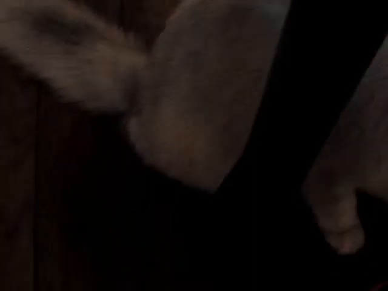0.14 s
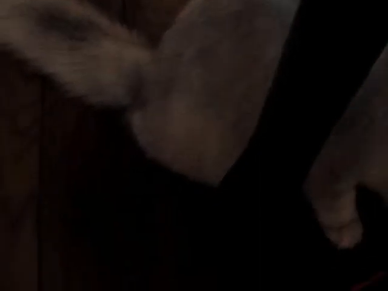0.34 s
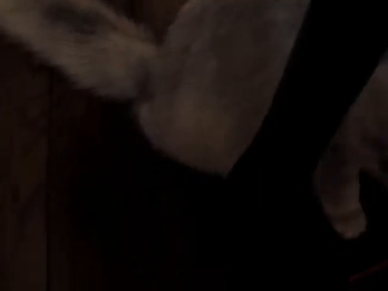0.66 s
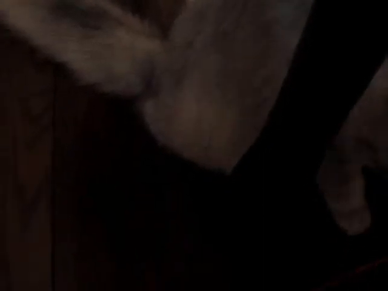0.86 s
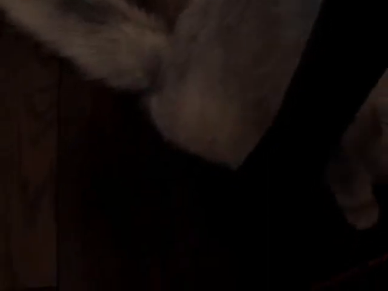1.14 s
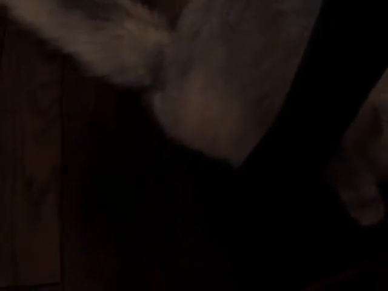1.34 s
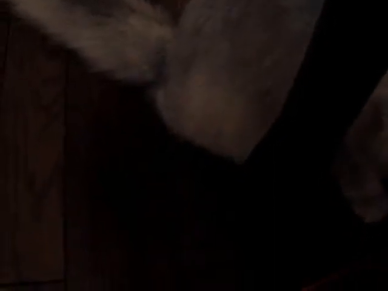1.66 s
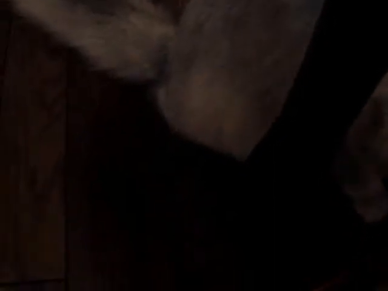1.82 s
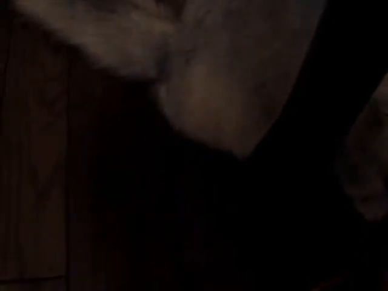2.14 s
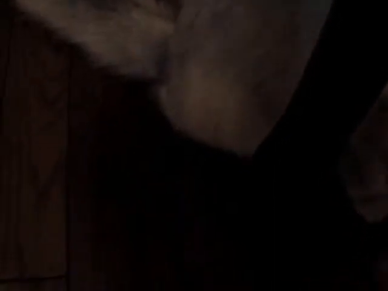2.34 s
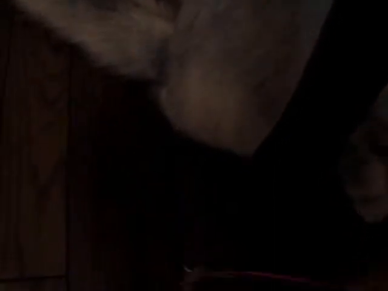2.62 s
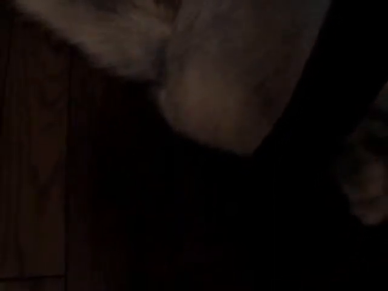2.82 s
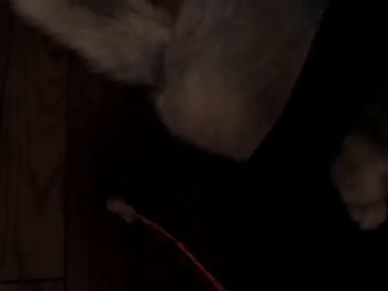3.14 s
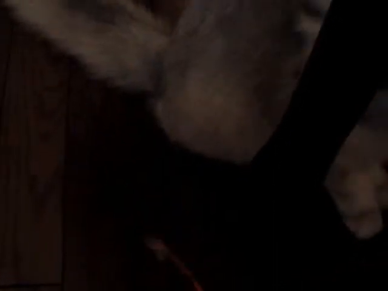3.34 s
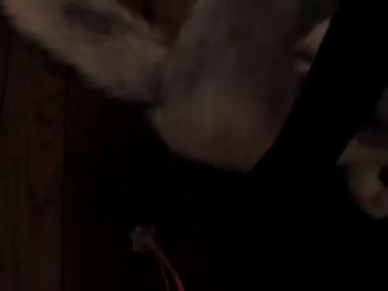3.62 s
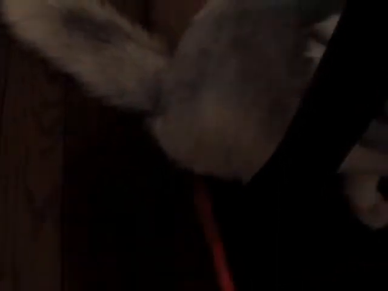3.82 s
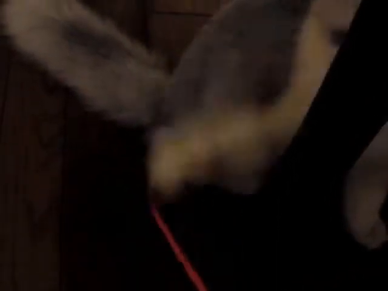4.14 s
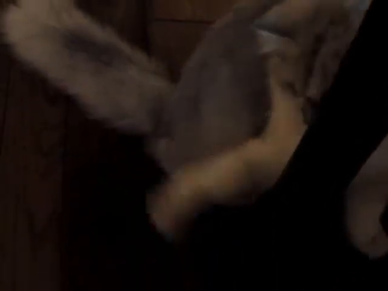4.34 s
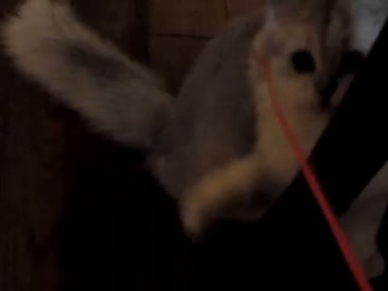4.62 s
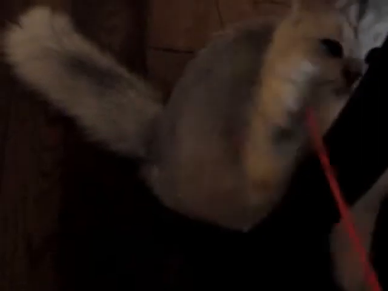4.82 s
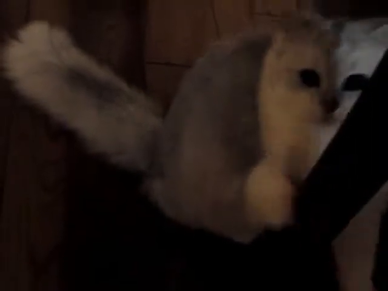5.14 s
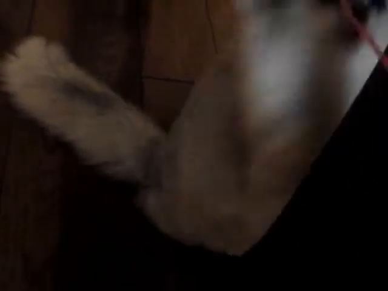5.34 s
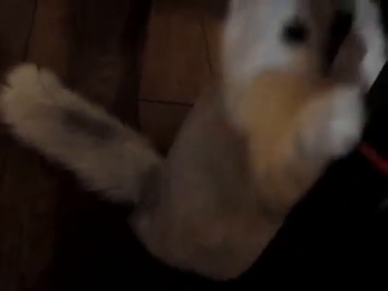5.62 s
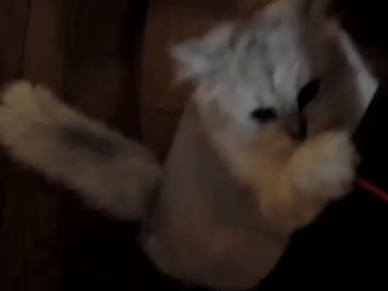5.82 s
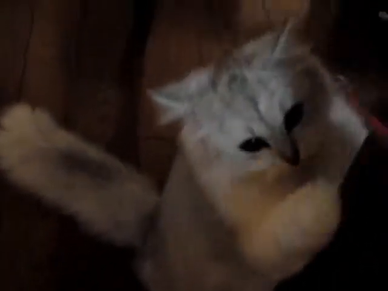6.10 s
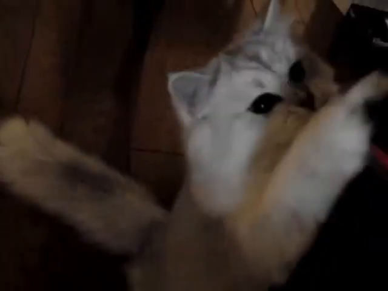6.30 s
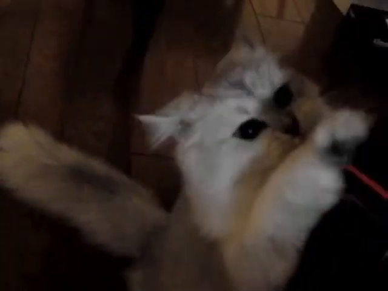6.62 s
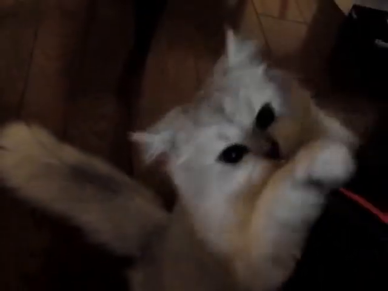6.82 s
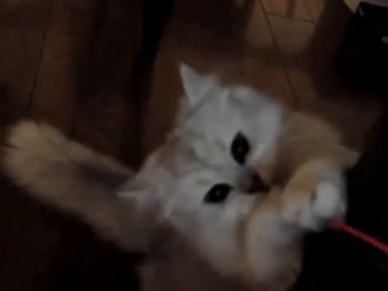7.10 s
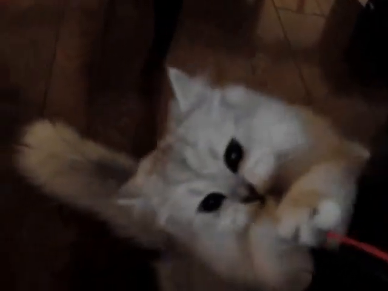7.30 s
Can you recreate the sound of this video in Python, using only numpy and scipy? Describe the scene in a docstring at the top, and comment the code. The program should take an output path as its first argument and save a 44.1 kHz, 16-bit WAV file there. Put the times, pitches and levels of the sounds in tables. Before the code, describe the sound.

Soft brushing and dry taps on floorboards give way to busy, bright little bell jingles, with hollow knocks and sharp snaps in a quiet room.

```python
"""A toy brushes softly over a wooden floor in a quiet small room, then its wand clacks on the boards.
Its little bell jingles in short bursts: a pellet rings two shell modes until fur and paws choke them.
Wand clacks are coloured noise, rubbing and dragging are noise with tiny slips, all played by a cat.
Late on, the cat lunges and bumps three times into hollow furniture, a bank of decaying panel modes,
with two sharp bright snaps; a tiny squeak, a bending sine, comes among them.
Air, drone and a faint hum run throughout."""
import sys
import numpy as np
from scipy import signal
from scipy.fft import rfft, irfft, next_fast_len
from scipy.io import wavfile
from scipy.ndimage import map_coordinates

SR = 44100
rng = np.random.default_rng(int(sys.argv[2]) if len(sys.argv) > 2 else 0)


def store_wav(level_fs):
    """Save 16-bit WAV to argv[1]."""
    pcm = np.round(np.clip(np.atleast_2d(level_fs), -1, 1) * 32767)
    wavfile.write(sys.argv[1], SR, pcm.T.astype(np.int16))


N = 328986  # length in samples
TIME = np.arange(N) / SR  # seconds


def amp(db):
    """Decibels to gain."""
    return 10 ** (np.asarray(db) / 20)


def unit(x):
    """x at rms 1."""
    return x / np.sqrt(np.mean(np.abs(x) ** 2) + 1e-20)


def along(points, hz):
    """(Hz, value) points read on a log frequency axis."""
    f, v = np.transpose(points)
    return np.interp(np.log(hz + 1), np.log(f + 1), v)


def fade(t, t60):
    """Exponential decay by 60 dB in t60 seconds."""
    return np.exp(-np.log(1000) * t / t60)


def filtered(x, response):
    """x times a response of frequency."""
    m = next_fast_len(len(x) + 8192)
    spectrum = rfft(x, m) * response(np.fft.rfftfreq(m, 1 / SR))
    return irfft(spectrum, m)[:len(x)]


def coloured(x, spectrum):
    """x with a (Hz, dB) colour, at rms 1."""
    return unit(filtered(x, lambda hz: amp(along(spectrum, hz))))


def bass_cut(x, hz):
    """Small bodies radiate little below hz."""
    return signal.lfilter(*signal.butter(3, hz, "high", fs=SR), x)


def add(track, s, x):
    """Mix x into the track at s seconds."""
    part = track[round(s * SR):][:len(x)]
    part += x[:len(part)]


def wobble(rate):
    """A smooth random curve, rate knots a second."""
    knots = rng.standard_normal(int(N * rate / SR) + 4)
    return map_coordinates(knots, [TIME * rate])


# Colour of the room air and hiss. Each row: frequency in Hz, relative level in dB.
AIR_COLOUR = [(15, -45.5), (25, -14.5), (81, -6), (102, -8), (134, -3), (160, -2.5), (216, -1.5),
              (470, -1.5), (506, -3), (719, -3.5), (996, -6.5), (1380, -8), (2010, -11.5), (6370, -16),
              (10000, -22.5), (13000, -60.5), (22000, -120)]
# Narrow noise bands of the drone. Each row: centre in Hz, width in Hz, level in dB.
DRONE_BANDS = [(107.6, 21, -71.5), (1410, 260, -69.5), (7580, 130, -74)]


def floor(air_db=-54.5, motor_hz=112, motor_db=-69):
    """Steady room air, a faint drone and the slightly wavering hum of a distant appliance."""
    air = amp(air_db + 0.14 * wobble(5.7)) * coloured(rng.standard_normal(N), AIR_COLOUR)
    drone = np.zeros(N)
    for centre, width, db in DRONE_BANDS:
        band = filtered(rng.standard_normal(N), lambda f: 1 / (1 + (2 * (f - centre) / width) ** 2))
        drone += amp(db) * unit(band)
    motor_phase = 2 * np.pi * motor_hz * TIME + 0.85 * wobble(6)
    motor = amp(motor_db + 1.5 * wobble(2.5)) * np.sqrt(2) * np.sin(motor_phase)
    return air + drone + motor


def friction(rate, spread_db, smooth):
    """Tiny slips of uneven size, rate a second, over a smooth rub."""
    sizes = amp(spread_db * np.clip(rng.standard_normal(N), -2, 2))
    slips = (rng.random(N) < rate / SR) * rng.choice([-1, 1], N) * sizes
    return unit(unit(slips) + smooth * rng.standard_normal(N))


def strokes(rows, attack_s=0.013, release_t60=0.067):
    """Gain of rubbing strokes: each rises, holds and dies away."""
    gain = np.zeros(N)
    for s, length, db in rows:
        rise = np.clip((TIME - s) / attack_s, 0, 1)
        gain += amp(db) * rise * fade(np.maximum(TIME - s - length, 0), release_t60)
    return gain


# Strokes of the toy brushing the floor. Each row: start in seconds, length in seconds, level in dB.
BRUSH_STROKES = [(0, 0.084, -55), (.19, .2, -53), (1.19, 0.062, -52.5), (1.655, 0.014, -46),
                 (2.35, 0.076, -48), (2.44, 0.11, -51), (2.55, 0.14, -46.5), (2.715, 0.022, -43.5)]
# Colour of the brushing. Each row: frequency in Hz, relative level in dB.
BRUSH_COLOUR = [(120, -50), (200, -7), (332, -5), (366, -33), (404, -18), (517, 6.5), (753, -9), (1030, 5),
                (1230, 0.5), (2080, -5), (10000, -24.5), (13000, -69), (22000, -120)]
# Strokes of the wand sliding with a brighter hiss. Each row: start in seconds, length in seconds, level in dB.
SLIDE_STROKES = [(.02, .05, -51), (.215, .1, -44)]
# Colour of the sliding. Each row: frequency in Hz, relative level in dB.
SLIDE_COLOUR = [(300, -34), (1300, -9), (1750, 4), (2150, 2.5), (2600, -1.5), (3600, -6.5), (6000, -12.5),
                (10000, -29)]
# How hard the wand's grip is dragged over the boards. Each row: time in seconds, drive in dB before colouring.
DRAG_PRESSURE = [(2.776, -50), (2.782, -30.5), (2.812, -42.5), (2.858, -30), (2.9, -39.5), (2.992, -39),
                 (3.054, -34.5), (3.08, -28), (3.15, -65)]
# Colour of the drag. Each row: frequency in Hz, relative level in dB.
DRAG_COLOUR = [(90, -53), (160, -22), (320, -19), (620, -6.5), (900, 0.5), (1100, -8.5), (1600, -4.5),
               (2400, -10.5), (2800, -14), (3600, -12), (5500, -30.5), (8000, -54)]
# Resonances of the boards. Each row: centre in Hz, width in Hz, strength in dB against the direct slips.
BOARD_MODES = [(401, 34, 13), (800, 70, -3.5), (969, 22, 12), (1300, 60, 5), (1780, 32, 1), (2331, 45, 12)]


def rubbing():
    """The toy brushes softly and slides; the hard grip chatters over the grain and sets the boards ringing."""
    brush_grain = friction(rate=500, spread_db=1.5, smooth=0.44)
    brush = strokes(BRUSH_STROKES) * coloured(brush_grain, BRUSH_COLOUR)

    slide_grain = friction(rate=2400, spread_db=17.0, smooth=0.97)
    slide = strokes(SLIDE_STROKES) * coloured(slide_grain, SLIDE_COLOUR)

    # no drag at all outside the table
    pressure = amp(np.interp(TIME, *np.transpose(DRAG_PRESSURE), left=-np.inf, right=-np.inf))
    slips = pressure * friction(rate=500, spread_db=1.0, smooth=0.74)

    def boards(f):
        """The direct slips plus each resonance they excite."""
        return 1 + sum(amp(db) * 1j * f * w / (c * c - f * f + 1j * f * w) for c, w, db in BOARD_MODES)

    drag = filtered(slips, lambda hz: amp(along(DRAG_COLOUR, hz) + 12.0) * boards(hz))
    return brush + slide + drag


# Taps and clacks of the wand, and two sharp bright snaps, perhaps claws, at the bumps.
# Each row: time in seconds, level in dB before the makeup gain in clacks(),
# brightness in dB per octave, length of its chatter in seconds.
CLACK_HITS = [(0.1167, -23, -1, 0.023), (0.218, -37.5, -7.5, 0.0039), (0.3704, -30, -1, 0.0033),
              (.701, -51, -8.5, 0.004), (1.2, -45.5, -9.5, 0.019), (1.454, -44, -16, 0.0038),
              (1.671, -42.5, -5, 0.0038), (1.959, -49, -11, 0.0045), (2.558, -42, -4, .006),
              (2.602, -43.5, -4, 0.0076), (2.648, -40, -11, 0.0046), (2.7822, -27.5, -4.5, 0.0063),
              (2.822, -35.5, -7, 0.0045), (2.84, -32, -6.5, 0.043), (3.062, -33, 0, 0.019),
              (3.075, -33.5, 2, 0.015), (5.301, -27, 10, 0.0023), (6.3638, -26.5, 12.5, 0.00182)]


def chatter(count=4, loss_db=6, dulling=0.98):
    """Every contact (s, dB, brightness): rebounds grow weaker (dB) and duller (dB per octave)."""
    contacts = []
    for s, db, tilt, length in CLACK_HITS:
        for k in range(count):
            contacts.append((s + length * k / (count - 1), db - loss_db * k, tilt - dulling * k))
    return contacts


# Colour of the wand on wood, also lent to the snaps and the slap of the bumps.
# Each row: frequency in Hz, relative level in dB.
WAND_COLOUR = [(60, -36), (130, -17.5), (230, -3), (400, -11), (620, -4.5), (865, -0.5), (1150, -1.5),
               (1800, 3.5), (2400, 2.5), (3000, 1), (3500, 1.5), (4700, -5), (7000, -11.5), (10000, -19)]


def clacks(crack_t60=0.025, ring_t60=0.12, ring_db=-13, makeup_db=1):
    """The wand hits the boards, and two bright snaps: each a crack and a brief dense ring."""
    out, t = np.zeros(N), np.arange(SR // 5) / SR
    envelope = fade(t, crack_t60) + amp(ring_db) * fade(t, ring_t60)
    for s, db, tilt in chatter():
        def colour(hz):
            """The wand's colour, tilted by the brightness of this hit."""
            return amp(along(WAND_COLOUR, hz) + tilt * np.log2((hz + 600) / 2000))
        body = unit(filtered(rng.standard_normal(len(t)), colour))
        add(out, s, amp(db + makeup_db) * body * envelope)
    return bass_cut(out, 110)


# Clear strikes of the pellet in the bell. Each row: time in seconds, free ring in seconds,
# low mode level in dB, high mode level in dB.
CLEAR_STRIKES = [(.365, 0.016, -45, -48.5), (.415, .04, -52, -59.5), (.516, 0.027, -59, -70),
                 (1.707, 0.015, -47.5, -61), (1.835, 0.022, -61, -77), (2.029, 0.011, -52, -70),
                 (2.367, 0.018, -39, -56), (2.481, 0.011, -41.5, -58), (2.518, 0.021, -45, -66),
                 (2.571, 0.022, -44, -55), (2.8, 0.013, -44.5, -57), (2.907, 0.021, -45, -51.5),
                 (2.947, 0.026, -36.5, -59), (3.129, 0.021, -32, -38.5), (3.152, 0.015, -36.5, -45),
                 (3.178, 0.014, -39, -44.5), (3.254, 0.0088, -25.5, -32), (3.3, .01, -52, -41),
                 (3.313, 0.0049, -35, -52), (3.328, 0.015, -38, -32.5), (3.351, 0.022, -39, -55),
                 (3.388, 0.0067, -38, -41.5), (3.404, 0.034, -38, -48), (3.471, 0.012, -41, -51),
                 (3.555, .012, -41, -49), (3.585, 0.018, -42.5, -46), (3.794, 0.0097, -45, -54),
                 (3.809, .014, -47, -40.5), (3.852, 0.037, -47.5, -52), (3.995, 0.027, -47, -43),
                 (4.034, 0.035, -46, -44), (4.102, 0.038, -41, -42), (4.192, .017, -50.5, -51.5),
                 (4.25, 0.0054, -46, -49), (4.279, 0.01, -42, -39), (4.29, 0.02, -26.5, -35),
                 (4.335, 0.029, -36.5, -38), (4.371, 0.017, -40.5, -41.5), (4.427, 0.0075, -36.5, -43),
                 (4.456, 0.009, -39, -48), (4.467, 0.008, -38, -31), (4.494, 0.0056, -33, -42),
                 (4.547, 0.0074, -27, -29), (4.556, 0.015, -34, -34), (4.629, 0.0054, -42.5, -51),
                 (4.689, 0.015, -42.5, -42), (4.744, 0.026, -33.5, -40), (4.822, .011, -39.5, -44),
                 (4.964, 0.0062, -44, -53), (4.982, 0.017, -43.5, -44.5), (5.115, 0.022, -37.5, -36.5),
                 (5.156, .012, -46, -41.5), (5.249, 0.0061, -29.5, -30), (5.344, 0.012, -41.5, -46),
                 (5.505, 0.017, -32, -39), (5.602, .028, -29.5, -31.5), (5.633, 0.016, -30, -48),
                 (5.653, 0.018, -33, -42), (6.054, .013, -47.5, -60), (6.264, 0.029, -41.5, -49),
                 (6.337, 0.019, -35, -54), (6.365, 0.0045, -35, -47), (6.373, 0.018, -33, -51),
                 (6.395, 0.016, -29, -38), (6.412, 0.011, -29, -55), (6.489, 0.017, -46, -49),
                 (6.855, 0.039, -66, -65)]
# The toy is shaken and the pellet tumbles with light touches. Each row: start in seconds,
# length in seconds, typical touch level in dB.
SHAKE_BURSTS = [(2.335, .12, -57), (2.851, .05, -48.5), (2.997, .12, -55.5), (3.364, .095, -47.5),
                (3.51, .05, -51.5), (3.827, .08, -53), (4.306, .025, -44), (4.48, .025, -39.5),
                (4.58, .05, -47.5), (4.763, .06, -44), (4.902, .025, -53), (5.022, .06, -49.5),
                (5.195, .025, -47.5), (5.28, .05, -50), (5.463, .025, -53.5), (5.555, .05, -48),
                (5.669, .025, -45), (5.707, .05, -53.5), (6.291, .025, -50), (6.434, .05, -46.5)]
# a faint lead-in before each clear strike
LEAD_IN_S, LEAD_IN_LOSS_DB = 0.0036, 24
# after each clear strike the pellet falls back once, softer
FALLBACK_GAP_S, FALLBACK_LOSS_DB, FALLBACK_RING_S = 0.0065, 17.5, 0.0097
# light touches: ring varies by up to this many doublings either way, strength scatters in dB
TOUCHES_PER_S, TOUCH_RING_S, TOUCH_RING_DOUBLINGS, TOUCH_SCATTER_DB = 42, 0.013, 0.91, 3


def strikes():
    """Every ring (s, free ring s, low dB, high dB): clear strikes, their lead-ins and fallbacks, light touches."""
    rows = list(CLEAR_STRIKES)
    for s, free, low, high in CLEAR_STRIKES:
        fall_s = s + free + FALLBACK_GAP_S
        rows.append((fall_s, FALLBACK_RING_S, low - FALLBACK_LOSS_DB, high - FALLBACK_LOSS_DB))
        rows.append((s - LEAD_IN_S, LEAD_IN_S, low - LEAD_IN_LOSS_DB, high - LEAD_IN_LOSS_DB))
    for start, length, db in SHAKE_BURSTS:
        for k in range(round(length * TOUCHES_PER_S)):
            late = rng.random() / 2  # in slots
            ring = TOUCH_RING_S * 2 ** rng.uniform(-TOUCH_RING_DOUBLINGS, TOUCH_RING_DOUBLINGS)
            low, high = db + TOUCH_SCATTER_DB * rng.standard_normal(2)
            rows.append((start + (k + late) / TOUCHES_PER_S, ring, low, high))
    return rows


def rattle_of(free, db, typical_ring_s=0.014, typical_db=-39):
    """Rattle drive in dB: a rattling pellet chokes the ring, so a shorter ring carries more rattle."""
    # 0.94 dB per dB of strength, 5 dB for each halving of the ring
    return -49 + 0.94 * (db - typical_db) + 5 * np.log2(typical_ring_s / free)


# The two shell modes of the bell: low, high [Hz].
SHELL_HZ = (6283, 9670)
# Colour of the pellet rattling on the shell. Each row: frequency in Hz, relative level in dB.
RATTLE_COLOUR = [(3000, -23.5), (5000, -11), (5900, 0), (7000, 0.5), (8000, -2.5), (9200, -3.5),
                 (11000, 3.5)]


def bell(contacts_hz=170, kick=0.39, flutter=0.36, flutter_hz=230, rough_flutter=3,
         choke_t60=0.01, click_t60=0.024, swell_s=0.00033):
    """The pellet strikes and rebounds inside the shell, which rings until fur or the pellet chokes it."""
    t = np.arange(SR // 8) / SR
    slow = signal.butter(3, flutter_hz, fs=SR, output="sos")
    contacts = rng.random(N) < contacts_hz / SR
    # every contact knocks the phase of each mode a little (kick in radians)
    modes = []
    for hz in SHELL_HZ:
        knocks = np.cumsum(contacts * kick * rng.standard_normal(N))
        modes.append(np.exp(1j * (2 * np.pi * hz * TIME + knocks)))

    swings, clicks = np.zeros((2, N), complex), np.zeros(N)
    for s, free, low, high in strikes():
        rattle = rattle_of(free, (low + high) / 2)
        # a quick swell, a slight sag over the free ring, then the choke
        sag = amp(1.87 * (-0.5 - np.minimum(t / free, 1)))
        choke = fade(np.maximum(t - free, 0), choke_t60)
        life = sag * choke * (1 - np.exp(-t / swell_s))

        def shaped(x):
            """x through this strike's life, levelled by its rms over the free ring."""
            return life * x / np.sqrt(np.mean(np.abs(x[t < free]) ** 2))

        # the harder the pellet rattles, the more it makes the modes flutter
        depth = flutter + rough_flutter * min(amp(rattle - max(low, high)) ** 2, 0.4)
        for swing, db in zip(swings, (low, high)):
            # the first half lets the filter settle
            noise = signal.sosfilt(slow, rng.standard_normal((2, 2 * len(t))))[:, len(t):]
            a, b = unit(noise)
            phase = np.exp(1j * rng.normal(0, 1.0))
            add(swing, s, amp(db) * shaped(1 + depth * (a + 1j * b)) * phase)

        # each contact restarts a decaying tick of noise
        latest = np.maximum.accumulate(t * contacts[round(s * SR):][:len(t)])
        ticks = fade(t - latest, click_t60) + 0.065
        add(clicks, s, amp(rattle) * shaped(ticks * rng.standard_normal(len(t))))

    rings = np.sqrt(2) * np.real(swings * modes).sum(axis=0)
    rattling = filtered(clicks, lambda hz: amp(along(RATTLE_COLOUR, hz) + 11))
    return bass_cut(rings, 2700) + rattling


# Bumps on the furniture. Each row: time in seconds, drive in dB, contact corner in Hz (lower is softer).
BUMP_HITS = [(5.302, -34.5, 3260), (5.309, -39, 990), (5.574, -44.5, 3030), (5.5804, -30.5, 2020),
             (5.585, -31.5, 1110), (5.615, -31.5, 350), (6.304, -37, 278), (6.336, -34, 276),
             (6.364, -40, 4030), (6.371, -31.5, 990)]
# Modes of the hollow panel. Each row: frequency in Hz, relative level in dB, t60 in seconds.
PANEL_MODES = [(259.2, -5.5, 0.25), (280.4, -8.5, 0.21), (504, -19, 0.083), (665, -12, 0.16),
               (713, -11, 0.25), (775.4, 0, 0.1), (832, -5.5, 0.13), (917, -2.5, 0.057),
               (1214, -11.5, 0.099), (1270, -12, 0.054), (1663, -8, 0.066), (1950, -18, 0.05),
               (2200, -14, 0.066), (3310, -7, 0.12), (4190, -8, 0.062)]


def bumps(slap_t60=0.057, thump_hz=190):
    """Each bump rings the hollow panel; softer contacts reach only its low modes."""
    out, t = np.zeros(N), np.arange(SR // 2) / SR
    for s, db, corner_hz in BUMP_HITS:
        ring = np.zeros(len(t))
        for hz, level, t60 in PANEL_MODES:
            # level and pitch of each mode scatter a little from bump to bump
            gain, scattered_hz = amp(level + rng.normal(0, 1)), hz * rng.normal(1, 0.015)
            ring += gain * fade(t, t60) * np.sin(2 * np.pi * scattered_hz * t + rng.uniform(0, 2 * np.pi))
        slap = fade(t, slap_t60) * coloured(rng.standard_normal(len(t)), WAND_COLOUR)
        softness = signal.butter(2, min(corner_hz, SR / 3), fs=SR)
        add(out, s, amp(db) * signal.lfilter(*softness, ring + slap))
    return bass_cut(out, thump_hz)


# Tiny squeaks. Each row: time in seconds, peak level in dB.
SQUEAK_TIMES = [(6.155, -51.5)]


def squeak(pitch_hz=2410):
    """A tiny squeak while the cat shifts its grip: a sine of uneven pitch that swells and fades."""
    out, t = np.zeros(N), np.arange(SR // 35) / SR
    for s, db in SQUEAK_TIMES:
        phase = 2 * np.pi * pitch_hz * t + 0.9 * wobble(200)[:len(t)]
        add(out, s, amp(db) * np.hanning(len(t)) * np.sin(phase))
    return out


# Decay of the small room. Each row: frequency in Hz, t60 in seconds.
ROOM_DECAY = [(200, 0.34), (1500, 0.19), (5000, 0.24), (10000, 0.14)]


def room(x):
    """A short diffuse tail of decaying noise, the top treble dying first."""
    hz, t, z = signal.stft(rng.standard_normal(SR // 2), SR, nperseg=256)
    decay = fade(t, along(ROOM_DECAY, hz)[:, None])
    tail = signal.istft(z * decay, SR, nperseg=256)[1]
    delayed = np.pad(tail / np.linalg.norm(tail), (SR // 200, 0))  # 5 ms before the tail
    return signal.fftconvolve(x, delayed)[:N]


def scene():
    """The bell is close and dry; the floor sounds carry more of the room."""
    air = floor()
    wood = rubbing() + clacks() + squeak()
    jingle = bell()
    thuds = bumps()
    reverb = room(amp(-34.5) * jingle + amp(-9.0) * wood + amp(-10) * thuds)
    return (jingle + wood + thuds + reverb + air)[None]


def record(dry, top_hz=10100):
    """A very steep band limit removes the sound above top_hz."""
    return filtered(dry[0], lambda hz: 1 / np.sqrt(1 + (hz / top_hz) ** 300))[None]


dry = scene()
out = record(dry)
store_wav(out)
```